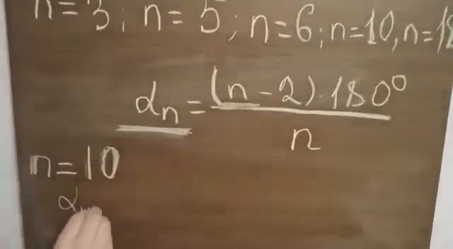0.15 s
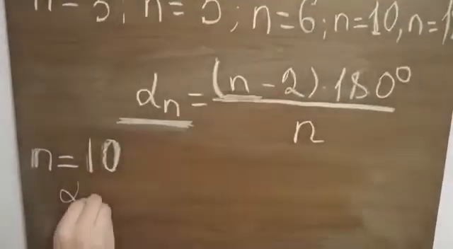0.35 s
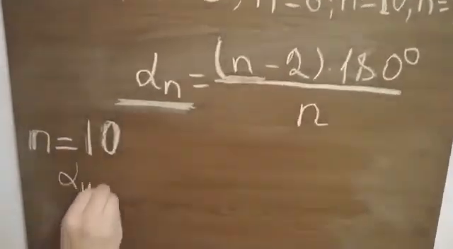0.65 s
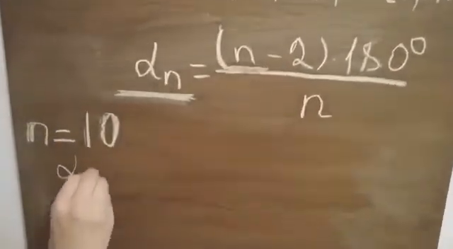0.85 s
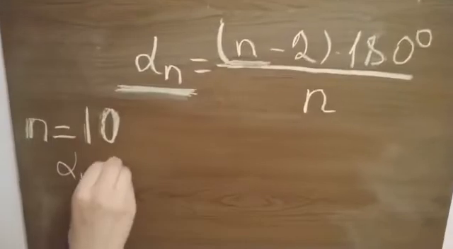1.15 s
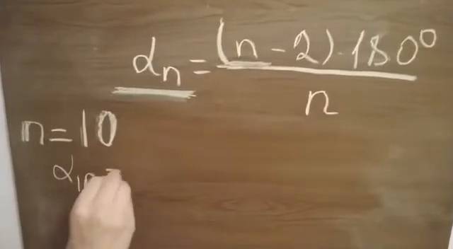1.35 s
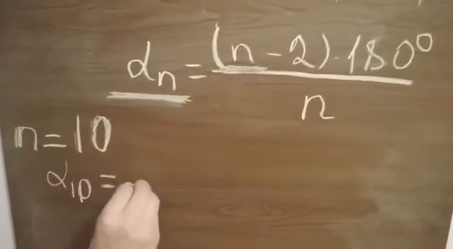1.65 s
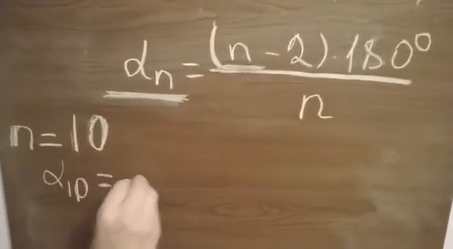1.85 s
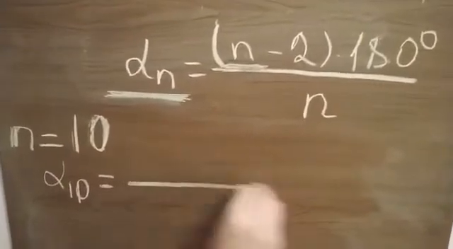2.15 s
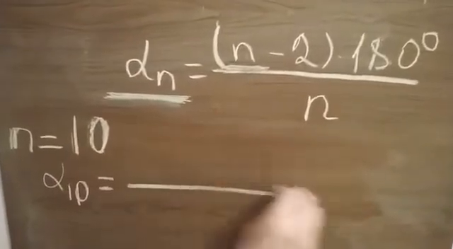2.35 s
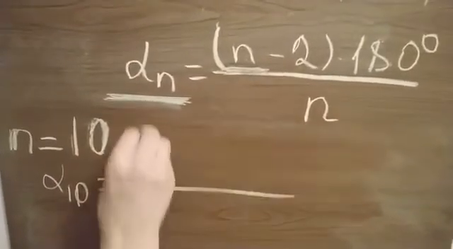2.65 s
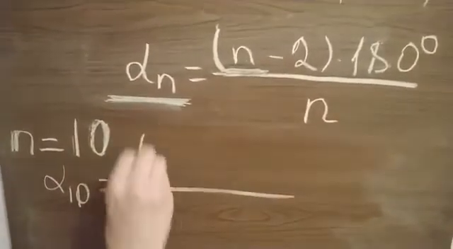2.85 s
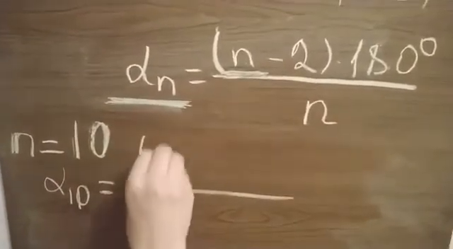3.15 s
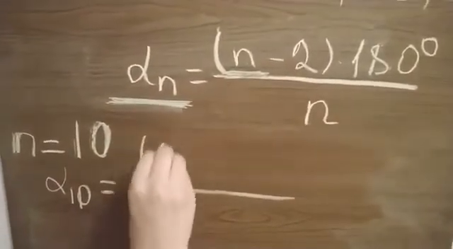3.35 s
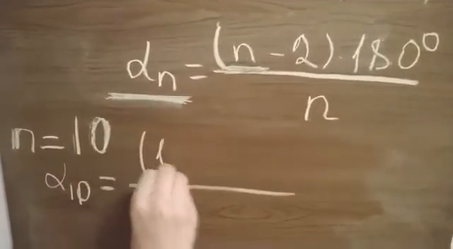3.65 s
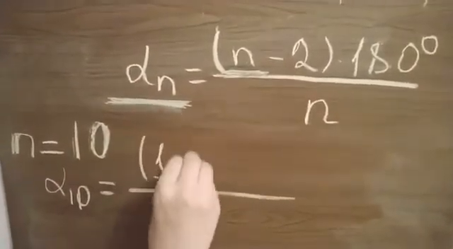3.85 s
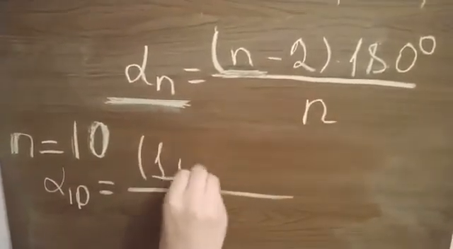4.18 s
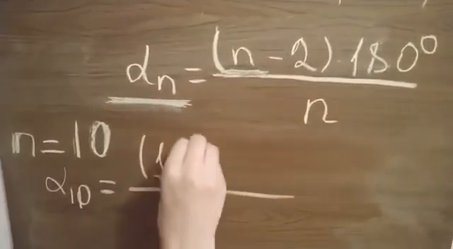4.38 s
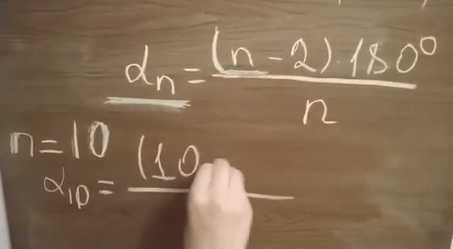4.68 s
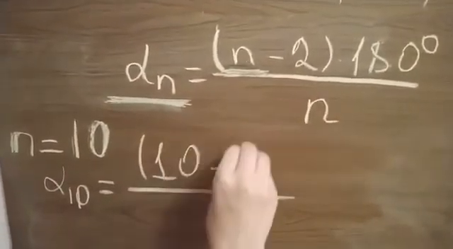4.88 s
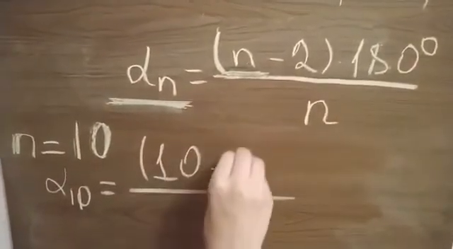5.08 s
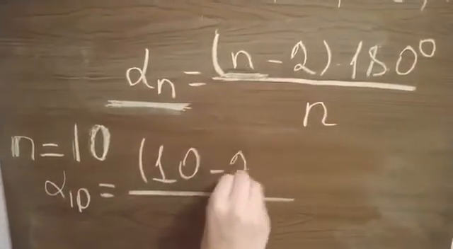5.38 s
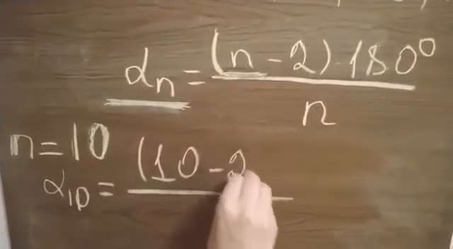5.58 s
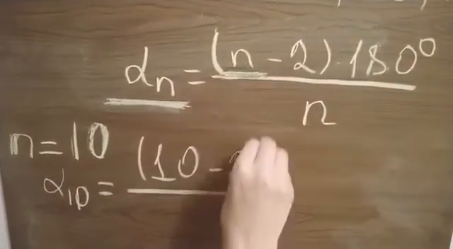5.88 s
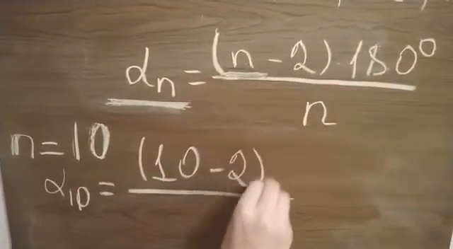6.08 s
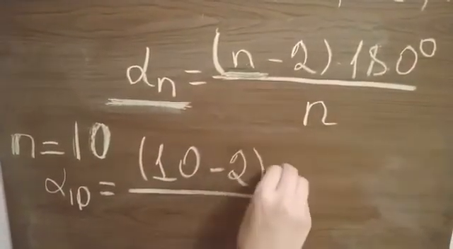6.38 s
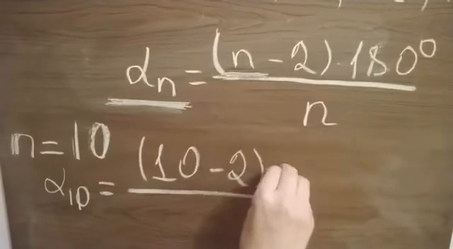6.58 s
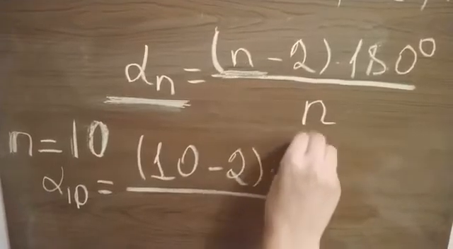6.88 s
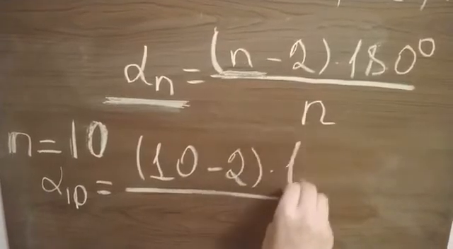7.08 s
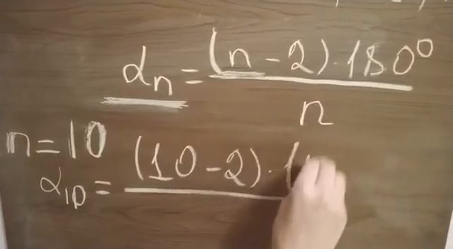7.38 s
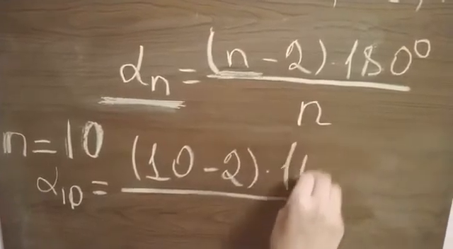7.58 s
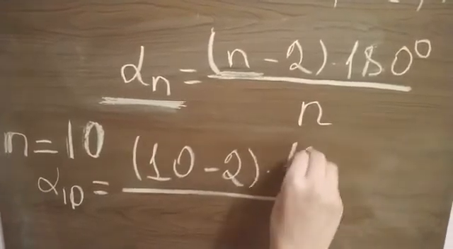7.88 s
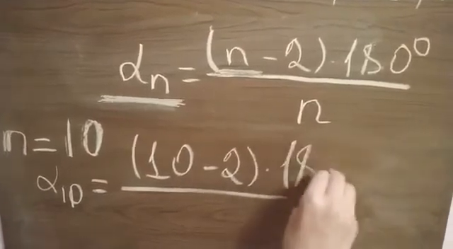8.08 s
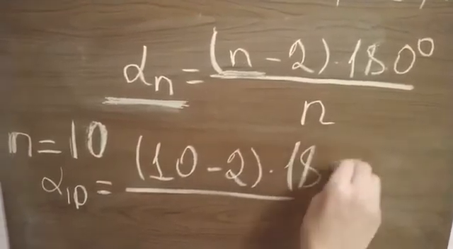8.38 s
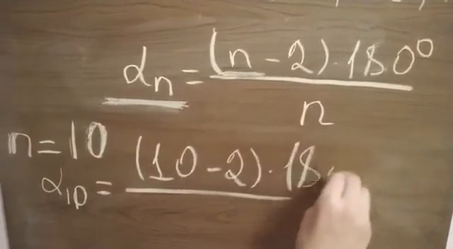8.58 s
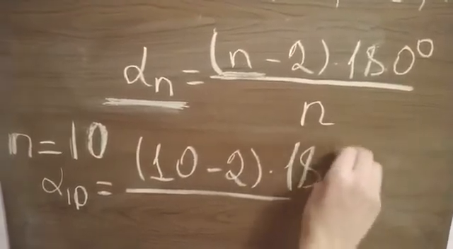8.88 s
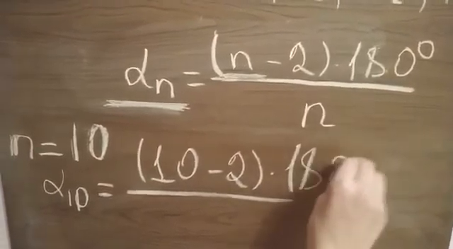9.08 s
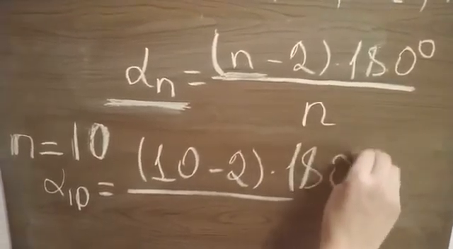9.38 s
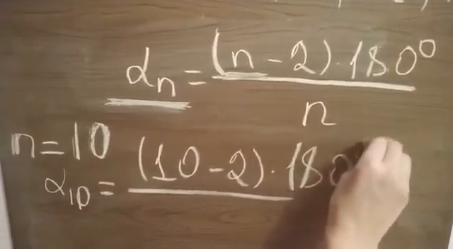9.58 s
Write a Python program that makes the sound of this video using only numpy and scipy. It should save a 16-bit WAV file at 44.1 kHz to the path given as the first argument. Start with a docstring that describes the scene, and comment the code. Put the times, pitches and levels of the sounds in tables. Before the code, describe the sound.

Irregular hollow chalk knocks and short dry scratches run throughout, close to the microphone and brighter on the left side. A brief low groan of rubbing wood comes early, then a longer drawn-out scrape, then small taps and strokes with little pauses. Muffled handling bumps interrupt, mostly in the first half. The room is quiet, with a short tail, faint air noise and thin electrical whine.

```python
"""Chalk on a wooden board

A hand writes with chalk in a quiet room, close to a phone whose left port faces the board.
Strokes start with a hollow tap: a swing of the wood, ringing modes, bursts of noise. Chalk dust then hisses
and scrapes as shaped noise, and the board rumbles as noise through resonances; low groans are swelling sines.
Fingers bump the phone softly; the room adds a short tail, a low murmur of air and thin electrical whines."""
import sys
import numpy as np
from scipy import signal
from scipy.fft import rfft, irfft, next_fast_len
from scipy.io import wavfile
from scipy.ndimage import uniform_filter1d, map_coordinates

SR = 44100
rng = np.random.default_rng(int(sys.argv[2]) if len(sys.argv) > 2 else 0)


def transcribe(signal):
    """Save signal, clipped to [-1, 1], as a 16-bit WAV file at the path in sys.argv[1]."""
    frames = np.atleast_2d(signal).T
    limited = np.clip(frames, -1, 1)
    pcm = np.round(limited * 32767).astype(np.int16)
    wavfile.write(sys.argv[1], SR, pcm)


N = 429093


def amp(db):
    """Gain of a level in dB."""
    return 10 ** (np.asarray(db) / 20)


def unit(x):
    """x at rms 1."""
    return x / np.sqrt(np.mean(x ** 2) + 1e-20)


def along(points, hz):
    """Values of (Hz, value) points, interpolated on a log frequency axis."""
    f, v = np.transpose(points)
    return np.interp(np.log(hz + 1), np.log(f + 1), v)


def wobble(knots_per_s):
    """A smooth random curve through normal random knots."""
    knots = rng.standard_normal(int(N * knots_per_s / SR) + 4)
    return map_coordinates(knots, [np.arange(N) * knots_per_s / SR])


def filtered(x, response):
    """x times a complex response of frequency."""
    m = next_fast_len(N + SR // 2)
    return irfft(rfft(x, m) * response(np.fft.rfftfreq(m, 1 / SR)), m)[..., :N]


def coloured(x, spectrum):
    """x shaped by a (Hz, dB) spectrum."""
    return filtered(x, lambda hz: amp(along(spectrum, hz)))


def struck(x, spectrum):
    """x shaped by a (Hz, dB) spectrum that answers only after each blow (minimum phase)."""
    cepstrum = irfft(np.log(amp(along(spectrum, np.fft.rfftfreq(2048, 1 / SR)))))
    causal = cepstrum * np.r_[1, 2 * np.ones(1023), 1, np.zeros(1023)]
    return signal.fftconvolve(x, irfft(np.exp(rfft(causal))))[:N]


def echoes(x, rows):
    """x and its delayed copies, rows of (ms, gain)."""
    return filtered(x, lambda hz: 1 + sum(g * np.exp(-2j * np.pi * hz * ms / 1000) for ms, g in rows))


def patchy(x, depth_db):
    """x with random gain in patches of time and frequency."""
    z = signal.stft(x, nperseg=512)[2]
    field = uniform_filter1d(rng.standard_normal(z.shape), size=8, axis=0)
    field = uniform_filter1d(field, size=7, axis=1)
    return signal.istft(z * amp(depth_db * unit(field)), nperseg=512)[1][:N]


def push(hz, turns):
    """A short swing that swells and dies within a few turns; peak 1."""
    u = np.arange(SR // 20) / SR * hz
    swing = -np.sin(2 * np.pi * u) * u ** 2 * np.exp(-u / turns)
    return swing / np.abs(swing).max()


# Room murmur spectrum. Each row: frequency in Hz, relative level in dB per Hz.
MURMUR_SPECTRUM = [(24, -70), (40, -74), (95, -6), (125, -19.5), (162, 3), (344, 0.5), (643, -6.5),
                   (1170, -7.5), (1260, -9.5), (2480, -11), (3520, -14), (4880, -15.5), (15800, -17)]
# Port balance of the murmur. Each row: frequency in Hz, left over right in dB.
MURMUR_LEAN = [(60, 1), (240, -2.0), (950, 1), (3770, -1.5), (15000, -1)]
# Electrical whines. Each row: frequency in Hz, mean level in dB before the port gains.
WHINES = [(1276, -80), (3391, -76.5)]


def air():
    """Room murmur and microphone hiss, unrelated in the two ports, with faint whines mostly on the right."""
    lean = lambda hz: amp(along(MURMUR_SPECTRUM, hz) + along(MURMUR_LEAN, hz) * [[.5], [-.5]])
    murmur = unit(filtered(rng.standard_normal((2, N)) * amp(0.17 * wobble(2.96)), lean))
    murmur_rms_db = -58
    t = np.arange(N) / SR
    whine = sum(amp(db + wobble(11.0)) * np.sin(2 * np.pi * hz * t + wobble(4.9)) for hz, db in WHINES)
    port_gains_db = [[-10], [5]]
    return amp(murmur_rms_db) * murmur + whine * amp(port_gains_db)


# Reverberation. Each row: frequency in Hz, t60 in seconds.
TAIL_T60 = [(150, 0.61), (500, .28), (1100, 0.45), (3000, 0.55), (10000, 0.3)]


def room(x, alike_hz):
    """Each frequency of the tail dies at its own speed; four random tails take turns every quarter second."""
    out = np.zeros((2, N))
    turn = (np.arange(N) // (SR // 4)) % 4
    for k in range(4):
        hz, t, (common, apart) = signal.stft(rng.standard_normal((2, SR // 2)), SR, nperseg=256)
        apart = apart * (hz / (hz + alike_hz))[:, None]  # long waves reach both ports alike
        decay = amp(-60 * t / along(TAIL_T60, hz)[:, None])
        tail = signal.istft(np.array([common + apart, common - apart]) * decay, SR, nperseg=256)[1]
        heard = np.pad(x * (turn == k), (350, 0))[None]  # tail starts 350 samples late
        out += signal.fftconvolve(heard, tail / np.linalg.norm(tail[0]), axes=1)[:, :N]
    return out


# Shading by the phone body. Each row: frequency in Hz, full loss at the right port in dB.
SHADOW = [(200, 0.5), (700, 1), (1300, 9), (2400, 13), (4400, 25), (8000, 22.5), (15000, 28)]


def shaded(x, share):
    """The body of the phone shades the right port and the sound reaches it 0.1 ms later."""
    return filtered(x, lambda hz: amp(-share * along(SHADOW, hz)) * np.exp(-2j * np.pi * hz * .0001))


# Fingers shifting on the phone. Each row: start in seconds, peak in dB at the nearer port,
# nominal pitch in Hz, left over right in dB.
BUMPS = [(0.4365, -29, 784, 26), (0.4432, -32, 386, -12), (0.4537, -34.5, 190, -12),
         (0.4712, -39, 252, -11), (0.5077, -32.5, 390, -21), (1.2977, -47, 1200, 9), (1.299, -37, 193, -15),
         (1.4248, -30.5, 330, -3.5), (1.464, -39, 247, -1), (1.682, -46, 513, -3), (1.925, -30, 1170, 10),
         (2.1094, -40, 1200, 9), (2.516, -47.5, 445, -3), (2.9368, -35.5, 225, -10), (3.0583, -40, 252, 20),
         (3.2955, -31.5, 343, -13), (3.4424, -40, 252, 12), (3.4846, -33, 445, -17),
         (3.622, -40.5, 219, -8), (3.6519, -49, 1041, 17), (3.6552, -49, 252, 1), (3.7576, -44, 580, -1),
         (4.5045, -48, 291, -14), (4.5143, -42, 591, 1), (5.064, -35, 333, -13), (5.0794, -30.5, 1041, 21),
         (5.0819, -32.5, 250, -7), (5.4733, -42, 252, -14), (5.853, -40, 219, -11), (7.4615, -41, 904, 10),
         (7.6474, -43, 219, -7), (8.2524, -43, 250, -15), (8.2982, -46, 219, -15), (8.8355, -32.5, 780, 8),
         (9.5366, -46, 291, -7), (9.5508, -43, 386, -16), (9.566, -41, 291, -19), (9.586, -38, 282, -6),
         (9.6148, -44, 386, -19)]


def bumps():
    """Each soft contact gives one dull swing that reaches the ports through the case, with no room."""
    out = np.zeros((2, N + SR))
    for s, db, hz, lean_db in BUMPS:
        swing = push(hz, turns=0.33)
        port_db = db + np.minimum([[lean_db], [-lean_db]], 0)
        out[:, round(s * SR):][:, :len(swing)] += amp(port_db) * swing
    return out[:, :N]


# Low rough groans. Each row: centre in seconds, time from peak to 11 dB down in seconds,
# mean peak in dB, pitch at the centre in Hz, glide in Hz per second.
DRONES = [(1.44, .03, -43, 403, -2500), (1.483, 0.03, -46, 246, -200), (1.582, 0.045, -53, 245, 300),
          (9.439, 0.04, -51.5, 257, 0)]


def drones():
    """Unsteady low tones under a bell-shaped swell."""
    out = np.zeros(N)
    for s, fall_s, db, hz, glide_hz_per_s in DRONES:
        u = np.arange(N) / SR - s
        level = amp(db - 11 * (u / fall_s) ** 2 + 3 * wobble(60))
        out += level * np.sin(2 * np.pi * (hz + glide_hz_per_s / 2 * u) * u + 1.5 * wobble(40))
    return out


# Air returns from near surfaces. Each row: delay in ms, level in dB.
WALLS = [(3.2, -5.5), (8, -14), (12.5, -27), (20, -25)]


def burst(events, t60):
    """Noise that starts at each (s, dB) and dies fast; rough surfaces scramble every return anew."""
    starts = np.zeros(N)
    for s, db in events:
        starts[round((s + .0004) * SR)] = amp(db)  # sharpest as the first swing turns
    fade = amp(-60 * np.arange(SR // 20) / SR / t60)
    level = echoes(signal.fftconvolve(starts, fade)[:N], [(ms, amp(db)) for ms, db in WALLS])
    return level * rng.standard_normal(N)


# Crumbs splitting off the tip. Each row: start in seconds, noise drive in dB before the spectrum.
SPLINTERS = [(0.3525, -25), (1.083, -24), (1.0865, -26), (3.1097, -21.5), (7.3047, -43)]
# Crumb spectrum. Each row: frequency in Hz, gain in dB.
SPLINTER_SPECTRUM = [(1500, -3), (3000, -7), (6000, -8), (10000, -5.5), (12500, -15), (16000, -32)]


def splinters():
    """A crumb splits off the tip just after some landings: a very short noise burst."""
    return struck(burst(SPLINTERS, t60=0.01), SPLINTER_SPECTRUM)


# Edge returns of bending waves, some upside down. Each row: delay in ms, gain.
EDGES = [(4.31, 1.17), (6.83, -0.58), (8.84, -0.03), (12.72, -0.36), (15.33, -0.027), (17.91, -0.031),
         (26.01, 0.1), (31.36, -0.03), (37.64, 0.14)]
# Lasting board modes. Each row: frequency in Hz, mean level over the knock in dB, t60 in seconds.
BOARD_MODES = [(205.2, -40.5, 0.61), (377, -24.5, 0.25), (498, -37, 0.74), (664, -11.5, 0.062),
               (880, -20, 0.066), (1074, -32, 0.087)]
# Slap of the stick. Each row: frequency in Hz, gain in dB.
SLAP_SPECTRUM = [(700, -22.5), (1020, 12.5), (1300, -0.5), (2000, -3.5), (2700, -6.5), (4500, -31.5)]
# Crack at the tip. Each row: frequency in Hz, gain in dB.
CRACK_SPECTRUM = [(1500, 0), (3000, -3), (5500, -4), (7000, -12.5), (10000, -8), (12000, -21), (13000, -52),
                  (16000, -30)]
# Chalk landings. Each row: start in seconds, knock drive in dB, slap drive over the knock in dB,
# crack drive over the knock in dB, feed to the edge returns in dB. Fixed gains and spectra follow.
TAPS = [(0.3419, -20, -12, -18, -2), (1.0698, -13.5, -17.5, -6, -1.5), (1.3494, -15, -17, -15, -4.5),
        (1.7515, -17, -17, -17, 0), (2.7301, -14.5, -11.5, -10, 0.5), (3.0943, -11, -17.5, -9, -1),
        (4.0087, -13, -18, -17.5, -2), (4.6705, -14, -14.5, -13, 0), (4.9214, -15.5, -16.5, -30, 1),
        (5.8787, -15.5, -14, -15, -1), (6.3241, -14, -15, -9, 2), (6.7166, -16, -17, -19.5, 1),
        (7.2887, -19, -10.5, -10, 0.5), (8.4625, -16, -10.5, -7, 0), (9.2318, -21.5, -9.5, -6.5, -2.5)]


def taps():
    """Each landing swings the board once, leaves its modes ringing, slaps the stick and cracks at the tip."""
    knock, to_edges, ring = np.zeros((3, N + SR))
    t = np.arange(SR // 2) / SR
    swing, flick = push(hz=604, turns=0.35), push(hz=1085, turns=0.72)
    for s, db, slap_db, _, edge_db in TAPS:
        start = round(s * SR)
        blow = amp(db) * (swing + amp(slap_db - 4.5) * flick)
        knock[start:][:len(blow)] += blow
        to_edges[start:][:len(blow)] += amp(edge_db) * blow
        for hz, level_db, t60 in BOARD_MODES:
            mode = np.sin(2 * np.pi * hz * t) * (1 - np.exp(-t / 0.0019))
            scatter_db = rng.normal(0, 0.67)
            ring[start:][:len(t)] += amp(db + level_db + scatter_db - 60 * t / t60) * mode
    returns = echoes(to_edges[:N], EDGES) - to_edges[:N]
    slaps = [(s, db + slap_db) for s, db, slap_db, *_ in TAPS]
    cracks = [(s, db + crack_db) for s, db, _, crack_db, _ in TAPS]
    slap = amp(11) * struck(burst(slaps, t60=0.023), SLAP_SPECTRUM)
    crack = amp(5) * struck(burst(cracks, t60=0.013), CRACK_SPECTRUM)
    return knock[:N] + returns + ring[:N] + slap + crack


# Pulls of the hand. Each row: start in seconds, length in seconds, base level in dB,
# board rumble over base in dB, scrape over base in dB.
SWEEPS = [(0.406, 0.12, -60.5, 2.0, 0.5), (0.607, 0.14, -56.0, -5.5, 2.0), (0.805, 0.049, -61.5, 5, 3.0),
          (1.12, 0.11, -58, 2, -10), (1.402, 0.086, -58.5, 3.5, -0.5), (1.883, 0.4, -51.5, -1.0, -7),
          (2.792, 0.14, -51.0, 1, -2), (3.13, 0.111, -53, 0, -1.5), (3.32, 0.14, -55.5, 4.5, -2.5),
          (3.51, 0.047, -54, -0.5, -5), (3.664, 0.084, -55, -3.5, -4.5), (4.05, 0.19, -58, -5.5, -3),
          (4.24, 0.14, -51.5, -2, -2), (4.427, 0.084, -53.5, 3.0, -4.0), (4.712, 0.048, -51.5, 0.5, -7),
          (4.97, 0.066, -57, 5, -1.0), (5.093, 0.078, -54, -5, -0.5), (5.226, 0.18, -56, 4, -3),
          (5.418, 0.072, -54.5, -7, 0.0), (5.537, 0.13, -57, 4.5, -0.5), (5.93, 0.19, -54.5, 1.5, -1.5),
          (6.756, 0.084, -49, 0, 2), (6.914, 0.15, -50.5, 2.0, -4), (7.342, 0.16, -52.5, 2.5, -2.0),
          (7.561, 0.18, -50.5, -6, -2.0), (7.777, 0.26, -58, 2, -3.5), (8.031, 0.2, -56.5, -1.5, -3.5),
          (8.509, 0.17, -55.5, -3.5, -1), (8.725, 0.17, -49, -3, -4.5), (8.922, 0.13, -58.5, 1.5, -3.0),
          (9.298, 0.27, -59.5, -7, 0), (9.488, 0.094, -54, -5.5, -4), (9.631, 0.049, -51, -5.5, -4.0)]
SPEED_UP_S, SLOW_DOWN_S = 0.016, 0.017  # time constants
RUMBLE_LAG_S = 0.011  # rumble levels run this much behind the hiss and scrape levels


def sweeps():
    """Hiss, rumble and scrape levels: each sweep speeds up, holds, slows down; overlaps add in power."""
    t = np.arange(N) / SR - np.array([[0], [RUMBLE_LAG_S], [0]])
    power = np.zeros((3, N))
    for s, length_s, db, rumble_db, scrape_db in SWEEPS:
        near = slice(max(round((s - .2) * SR), 0), round((s + length_s + .3) * SR))
        u = t[:, near] - s
        gather = (1 + np.tanh(u / SPEED_UP_S / 2)) / 2
        slow = (1 - np.tanh((u - length_s) / SLOW_DOWN_S / 2)) / 2
        level = amp([[db], [db + rumble_db], [db + scrape_db]])
        power[:, near] += (gather * slow * level) ** 2
    return np.sqrt(power)


# Board resonances under the chalk. Each row: centre in Hz, width in Hz, relative gain in dB.
RUBBED_MODES = [(227, 24, -1), (516, 90, 0.5), (708, 57, 1), (859, 45, -1.5), (1058, 63, -1),
                (1313, 64, -7)]


def board_response(f):
    """Resonances of alternating sign; a thin board radiates its lowest modes weakly; the treble rolls off."""
    wood = 0
    for k, (centre, width, db) in enumerate(RUBBED_MODES):
        resonance = 1j * f * width / (centre * centre - f * f + 1j * f * width)
        wood = wood + (-1) ** k * amp(db) * resonance
    return wood * f / (f + 400) / (1 + (f / 1500) ** 4)


# Dust hiss spectrum. Each row: frequency in Hz, relative level in dB per Hz.
HISS_SPECTRUM = [(5000, -12.5), (7600, -7), (8600, 0), (10200, 4.5), (11500, -1.5), (13000, -3.5),
                 (15800, -7.5)]
# Tip scrape spectrum. Each row: frequency in Hz, relative level in dB per Hz.
SCRAPE_SPECTRUM = [(600, -70), (1400, 8), (3000, 3), (4800, 5.5), (6000, -0.5), (7500, 3), (9000, -71)]


def strokes():
    """Dust grains break under the tip: their hiss and scrape go to the air, their push into the board."""
    hiss, rumble, scrape = sweeps()
    flutter_db = 0.32 * wobble(40) + [0.32 * wobble(500), 2.0 * wobble(120), 2.3 * wobble(200)]
    dust_grit, board_grit, tip_grit = rng.standard_normal((3, N)) * amp(flutter_db)
    board = filtered(board_grit, board_response)
    dust = coloured(patchy(dust_grit, depth_db=2.5), HISS_SPECTRUM)
    tip = coloured(patchy(tip_grit, depth_db=1.6), SCRAPE_SPECTRUM)
    return hiss * unit(dust) * amp(5.5) + rumble * unit(board) + scrape * unit(tip)


def scene():
    """Chalk, direct and through the room, with bumps and air; the tail, from all sides, is shaded less."""
    chalk = drones() + splinters() + taps() + strokes()
    wet = amp(-6.5) * room(chalk, alike_hz=450)
    left = chalk + wet[0]
    right = shaded(chalk, share=1) + shaded(wet[1], share=0.51)
    return np.array([left, right]) + bumps() + air()


def record(dry):
    """The microphones lose the bass, the deepest less steeply, and nothing passes the band limit."""
    top_hz = 15780
    return filtered(dry, lambda hz: ((1j * hz / (1j * hz + 110)) ** 2 + amp(-12.5)) * (hz < top_hz))


dry = scene()
out = record(dry)
transcribe(out)
```